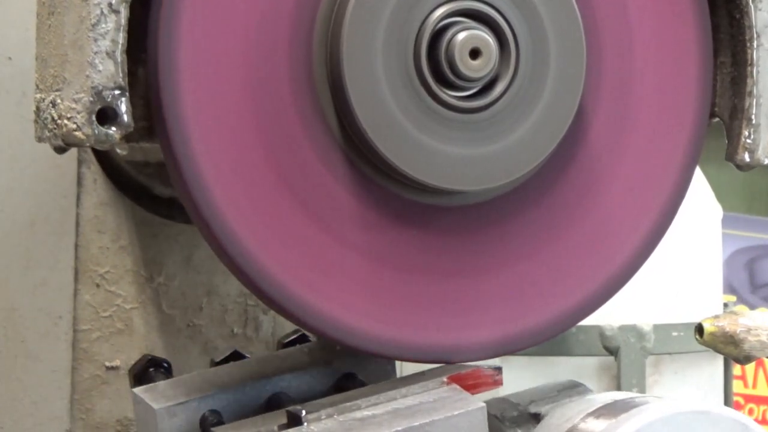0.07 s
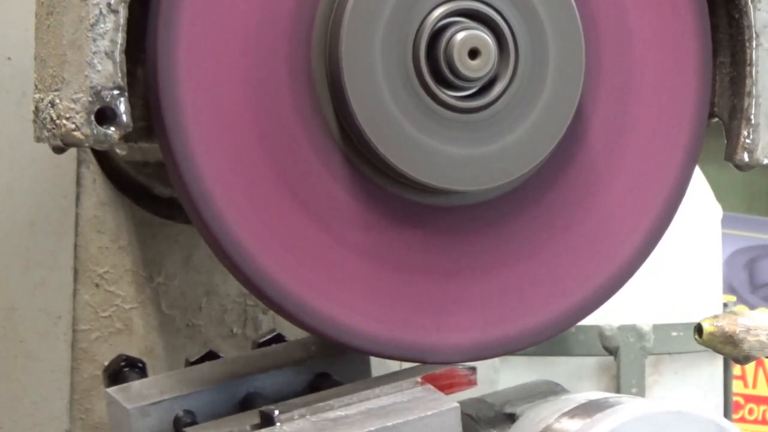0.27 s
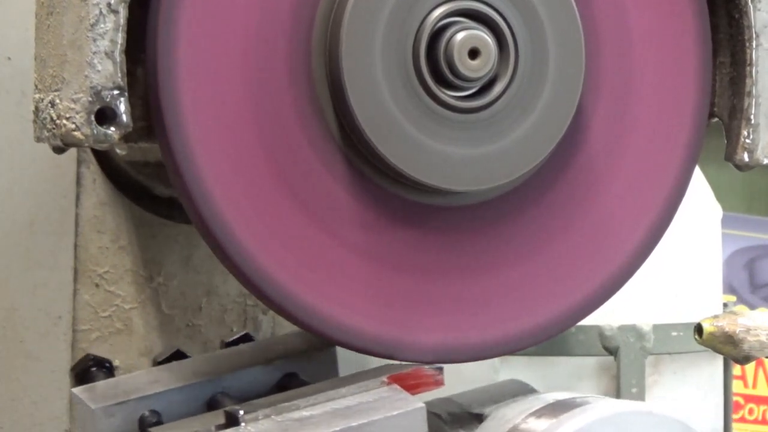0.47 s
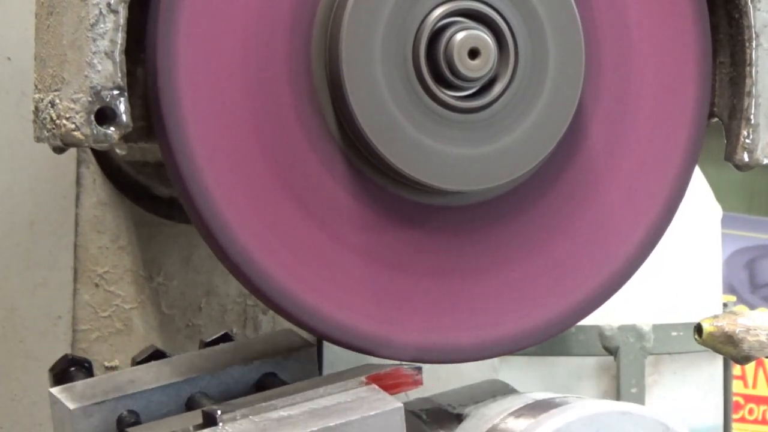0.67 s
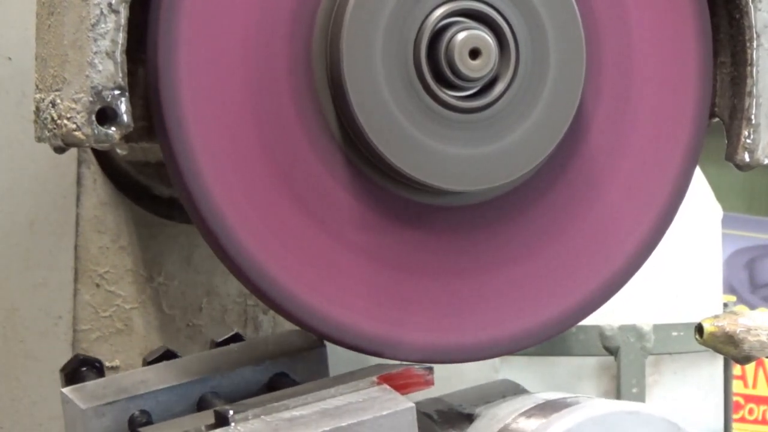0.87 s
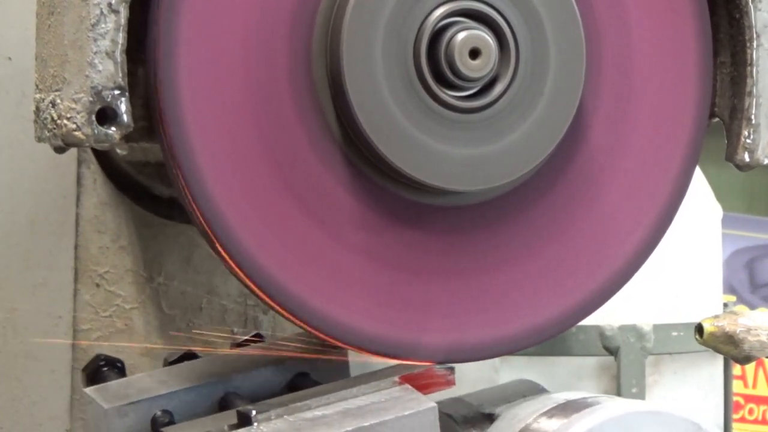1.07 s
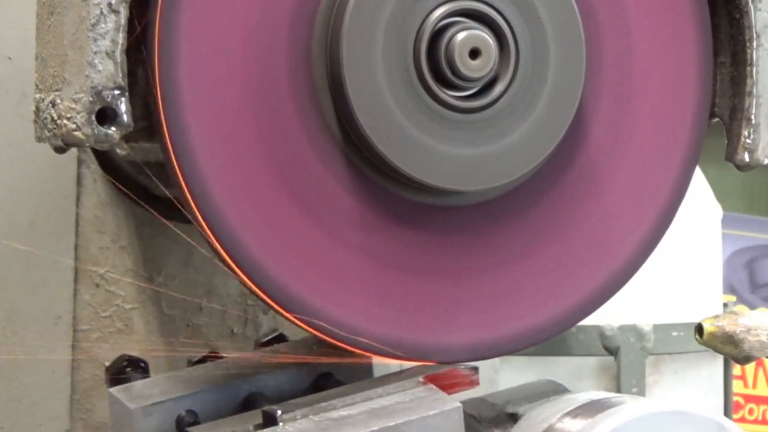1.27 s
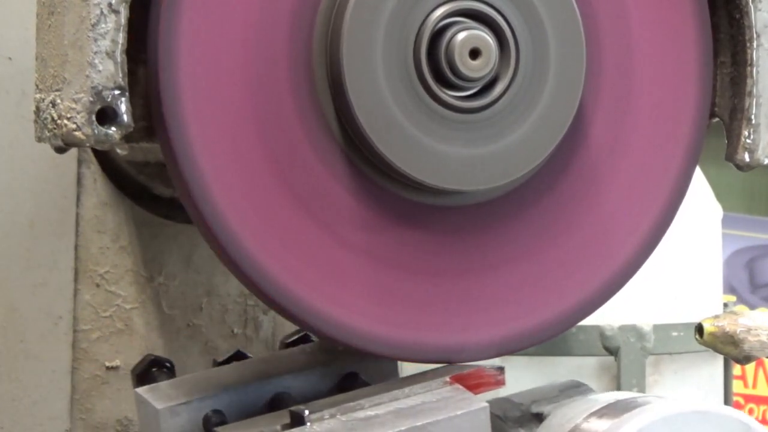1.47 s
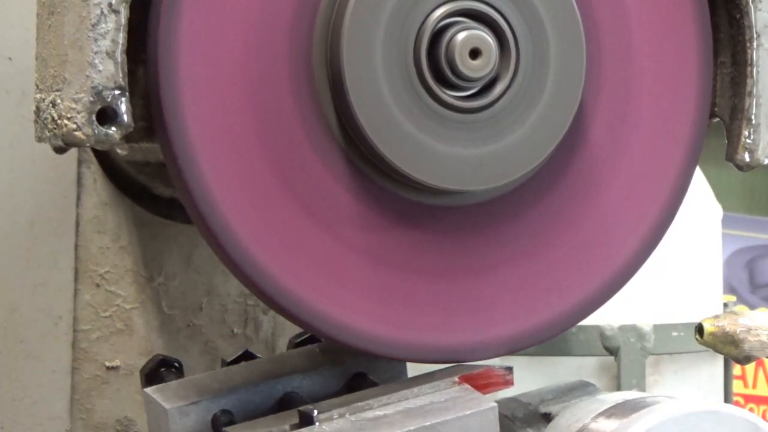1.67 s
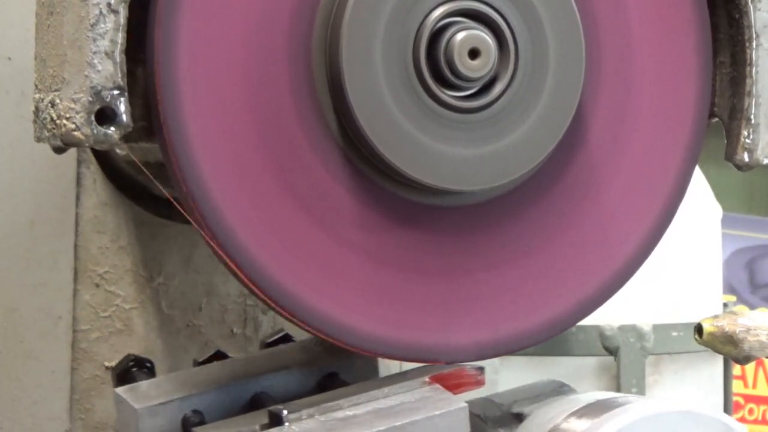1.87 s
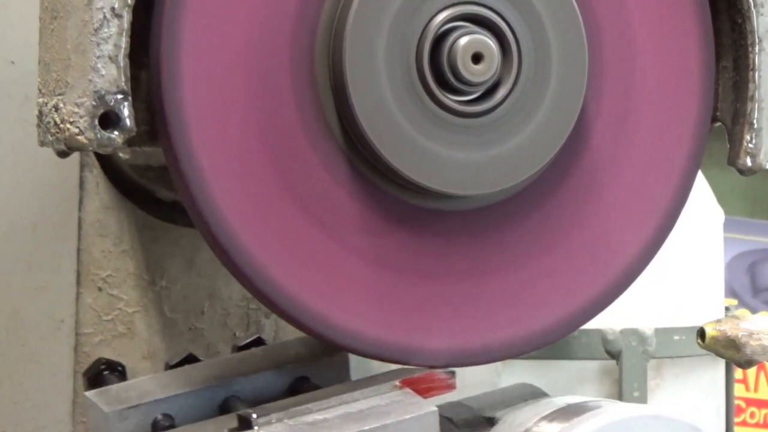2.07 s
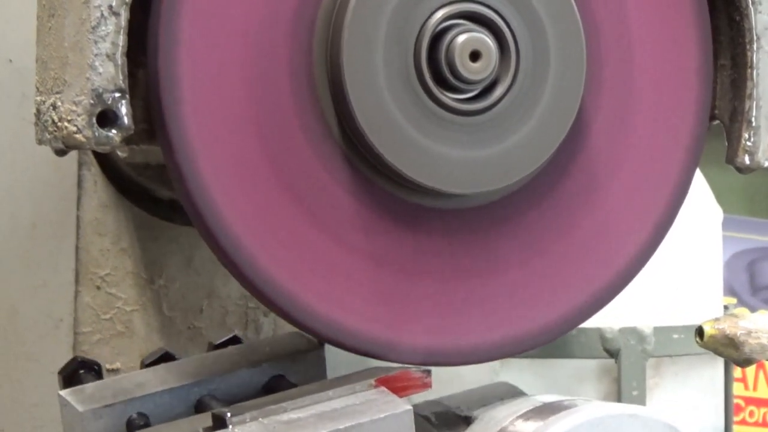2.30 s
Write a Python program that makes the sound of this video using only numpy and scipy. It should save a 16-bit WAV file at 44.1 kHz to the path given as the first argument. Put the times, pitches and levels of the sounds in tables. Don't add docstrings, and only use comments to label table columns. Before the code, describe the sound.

A surface grinder runs with a steady mid-pitched motor hum and airy roar; its wheel cuts steel in three abrupt, bright, buzzing rasps, the second longest. Close stereo microphone in a small workshop with short echo.

```python
import sys
import numpy as np
from scipy import signal
from scipy.fft import rfft, irfft, next_fast_len
from scipy.io import wavfile
from scipy.ndimage import uniform_filter1d, map_coordinates

SR = 44100
rng = np.random.default_rng(int(sys.argv[2]) if len(sys.argv) > 2 else 0)


def wrap_up_sound(samples):
    columns = np.atleast_2d(samples).T
    tamed = np.clip(columns, -1, 1)
    steps = np.round(tamed * 32767).astype(np.int16)
    wavfile.write(sys.argv[1], SR, steps)


def volts_from_decibels(level):
    exponent = np.asarray(level, float) / 20
    return 10 ** exponent


N = 103061
T = np.arange(N) / SR
LEFT_RIGHT = np.array([[1], [-1]])


def rms_one(x):
    return x / np.sqrt(np.mean(x ** 2) + 1e-20)


def colour(x, points):
    hz, db = np.transpose(points)
    size = next_fast_len(len(x) + 4096)
    bin_hz = np.arange(size // 2 + 1) * SR / size
    gain_db = np.interp(np.log(bin_hz + 1), np.log(hz), db)
    return irfft(rfft(x, size) * volts_from_decibels(gain_db), size)[:len(x)]


def resonate(x, hz, width_hz):
    r = np.exp(-np.pi * width_hz / SR)
    feed = np.sqrt((1 - r * r) / 2) * np.array([1, 0, -1])
    return signal.lfilter(feed, [1, -2 * r * np.cos(2 * np.pi * hz / SR), r * r], x)


def low_pass(x, hz):
    return signal.sosfilt(signal.butter(2, hz, fs=SR, output="sos"), x)


def drift(rate):
    count = int(T[-1] * rate * 2) + 2
    return np.interp(T * rate * 2, np.arange(count), rng.standard_normal(count))


def fan_and_bearing_roar():
    # pitch_hz, level_db
    roar_curve = [(25, -30), (150, -20.5), (300, -8.5), (1700, -8), (3000, -13.5), (10500, -19.5),
                  (13000, -33), (15600, -45)]
    # pitch_hz, level_db
    roar_width = [(60, -17), (250, -28.5), (500, -19), (950, -7), (2380, -7.5), (5980, -8.5),
                  (10000, -15.5), (14000, -45)]
    # pitch_hz, width_hz, level_db
    housing = [(272, 2.7, -15), (359.2, 13, -9.5), (390, 16, -14.5), (481, 4.6, -15.5), (950, 28, -16.5),
               (1052, 16, -13), (1126, 21, -18), (1520, 165, -9), (2075, 45, -17), (4100, 1600, -10)]
    roar_db, flicker_db = 3, 0.66
    white = rng.standard_normal((4, N))
    scale = volts_from_decibels(roar_db) / np.std(colour(white[0], roar_curve))
    pair = []
    for air, body in (white[:2], white[2:]):
        ringing = sum(volts_from_decibels(db) * resonate(body, hz, width) for hz, width, db in housing)
        pair.append(scale * colour(air, roar_curve) + ringing)
    mid, side = pair[0], colour(pair[1], roar_width)
    return np.array([mid + side, mid - side]) * volts_from_decibels(flicker_db * drift(15))


def motor_tones():
    # pitch_hz, level_db, wander_hz, left_right_db
    tones = [(59, -34, .5, 0), (89, -27, .5, 0), (119.5, -23, .5, 0), (178, -28, .5, 0), (228, -24, 1.5, 0),
             (410, -6, .8, -1.5), (831, -8.5, .8, 2)]
    out = np.zeros((2, N))
    for hz, db, wander_hz, pan_db in tones:
        phase = 2 * np.pi * np.cumsum(hz + wander_hz * drift(3.95)) / SR + rng.uniform(0, 6.3)
        lead = pan_db / 6 * LEFT_RIGHT
        loudness_db = db + 3 + 3.2 * drift(8) + pan_db / 2 * LEFT_RIGHT
        out += volts_from_decibels(loudness_db) * np.sin(phase + lead)
    return out


def motor():
    # start_s, level_db
    motor_level = [(0, -25.5), (.12, -25.5), (.32, -24.5), (.40, -30), (.47, -26), (.7, -25), (1.03, -23),
                   (1.08, -33), (1.3, -33.5), (1.46, -27.5), (1.5, -26.5), (1.84, -26), (1.98, -31),
                   (2.08, -34), (2.15, -26), (2.33, -27)]
    treble_follows = 0.9
    level_db = np.interp(T, *np.transpose(motor_level))
    sound = fan_and_bearing_roar() + motor_tones()
    low = low_pass(sound, 2500)
    treble = (sound - low) * volts_from_decibels((treble_follows - 1) * (level_db - level_db.max()))
    return volts_from_decibels(level_db) * (low + treble)


def shop(x):
    # pitch_hz, side_db relative to the middle
    shop_width = [(300, -14), (1500, 3), (4000, -4), (9000, -7), (13000, -46)]
    echo_db, fade_60db_s = -8, .17
    t = T[:SR // 2]
    tail = rng.standard_normal((2, SR // 2)) * volts_from_decibels(-60 * t / fade_60db_s) * (t > .002)
    mid, side = (signal.fftconvolve(x, h / np.sqrt(np.sum(h ** 2)))[:N] for h in tail)
    side = colour(side, shop_width)
    return volts_from_decibels(echo_db) * np.array([mid + side, mid - side])


def grit(size):
    spread_db = 1.5
    return rms_one(rng.standard_normal(size) * volts_from_decibels(spread_db * rng.standard_normal(size)))


def wheel_turns(since, fast, slow):
    sag_s = .04
    sagging = sag_s * (1 - np.exp(-np.abs(since) / sag_s))
    return slow * since + (fast - slow) * np.where(since > 0, sagging, since)


def oval_bite(angle, dip_db):
    rise, lift = 0.021, 0.32
    fall = 0.36 * (10.5 / np.maximum(dip_db, 3)) ** 2
    spots = []
    for late, share in ((0, 1), (.42, .2)):
        a = (angle - late) % 1
        spots.append(share * np.clip(a / rise, 0, 1) * np.exp(-a / fall))
    return np.clip((1 - angle) / lift, 0, 1) * np.max(spots, axis=0)


def grit_force(gate, angle, repeats):
    surface = map_coordinates(grit(760), [angle * 760], order=3, mode="grid-wrap")
    fresh = grit(N)
    swap = np.sqrt(repeats) * surface - (1 - np.sqrt(1 - repeats)) * fresh
    return gate * (fresh + low_pass(swap, 7750)) + 1e-18


def steel_rasp(force, since, dulling_db):
    # pitch_hz, level_db
    rasp_curve = [(700, -29), (1500, -2), (3000, -4), (5500, -2.5), (9000, -1), (11400, -2), (12800, -3),
                  (15600, -34)]
    rasp_db, dulling_s, dull_above_hz = 1.5, 0.24, 6300
    rasp = volts_from_decibels(rasp_db) * colour(force, rasp_curve)
    top = colour(rasp, [(dull_above_hz * 0.86, -40), (dull_above_hz, 0)])
    loaded = np.tanh(np.clip(since / dulling_s, 0, 9) ** 2)
    return rasp + top * (volts_from_decibels(dulling_db * loaded) - 1)


def wheel_ring(force, k):
    # pitch_hz, width_hz, pass_1_db, pass_2_db, pass_3_db
    wheel_modes = [(1650, 120, -23, -18.5, -11), (3732, 35, -10.5, -19, -13.5), (4130, 28, -27, -29, -23),
                   (4770, 60, -27, -34, -33), (5220, 140, -28, -20, -32), (5853, 88, -7.5, -13.5, -13.5),
                   (6425, 120, -13, -13, -9), (7620, 120, -18, -20, -14.5), (8330, 180, -8, -20, -10),
                   (9140, 36, -3, -22, -8.5), (9060, 360, -19, -11.5, -9.5), (11610, 36, -11, -11.5, -10),
                   (12370, 22, -12, -11, -7), (15090, 43, -27, -21.5, -19)]
    return sum(volts_from_decibels(row[2 + k]) * resonate(force, row[0], row[1]) for row in wheel_modes)


def pattern_tones(turns, since, strength, k):
    order_numbers = [
        [101, 157],
        [30, 36, 54, 65, 100, 110, 148, 158],
        [64, 65, 71, 83, 101],
    ]
    order_levels = [
        [-15, -12],
        [-18, -18, -15, -5, -14, -8, -12, -4],
        [-10, -12, -14, -15, -13],
    ]
    build_s = [.004, .09, .03][k]
    tones = np.zeros(N)
    for order, db in zip(order_numbers[k], order_levels[k]):
        phase = 2 * np.pi * order * turns + 1.16 * drift(5)
        tones += volts_from_decibels(db + 3 + 1.7 * drift(11)) * np.sin(phase)
    return strength * np.tanh(np.clip(since / build_s, 0, 9)) * tones


def wheel():
    # start_s (first bite), touch_turns_per_s, loaded_turns_per_s, repeat_share (0-1)
    passes = [
        (.327, 58.4, 58.3, .4),
        (1.029, 58.45, 57.94, .85),
        (1.8525, 58.3, 58.16, .7),
    ]
    # start_s, level_db, dip_db (between bites)
    cuts = [
        [(.29, -34.5, 12), (.324, -21, 8), (.328, -15, 13), (.40, -18.5, 9), (.455, -21.5, 7), (.47, -30, 4),
         (.49, -48, 18.5)],
        [(1.015, -39, 7), (1.04, -21.5, 5.5), (1.08, -20.5, 5.5), (1.15, -19.5, 4.5), (1.3, -21.5, 2.5),
         (1.39, -18, 8), (1.45, -18.5, 7), (1.465, -38, 7), (1.48, -50, 11)],
        [(1.84, -40, -1), (1.855, -19, 10), (1.88, -20.5, 8.5), (1.97, -21.5, 5.5), (2.05, -19.5, 6.5),
         (2.12, -21, 7), (2.145, -26.5, 8), (2.165, -48, 10)],
    ]
    # pitch_hz, level_db
    cut_colour = [(12450, 0), (12800, -8), (14300, -12), (15050, 0)]
    dulling_db, bite_spread_db = [3, -5.5, 0], .6
    out = np.zeros(N)
    for k, ((start, fast, slow, repeats), cut) in enumerate(zip(passes, cuts)):
        cut_s, cut_db, cut_dip_db = np.transpose(cut)
        since = T - start
        turns = wheel_turns(since, fast, slow)
        angle = turns % 1
        dip_db = np.interp(T, cut_s, cut_dip_db)
        bite = oval_bite(angle, dip_db)
        strength_db = bite_spread_db * rng.standard_normal(256)[np.floor(turns).astype(int) % 256]
        depth = volts_from_decibels(np.interp(T, cut_s, cut_db, left=-120, right=-120))
        gate = depth * volts_from_decibels(dip_db * (bite - 0.865) * 2.14 + strength_db)
        force = grit_force(gate, angle, repeats)
        out += steel_rasp(force, since, dulling_db[k]) + wheel_ring(force, k)
        smooth = np.sqrt(depth * np.abs(uniform_filter1d(gate, size=200)))
        out += pattern_tones(turns, since, smooth, k)
    return colour(out, cut_colour)


def scene():
    cut = wheel()
    return motor() + cut + shop(cut)


def top_cut(x):
    return signal.sosfilt(signal.butter(12, 15710, fs=SR, output="sos"), x)


def record(dry):
    cutoff_hz = 15230
    mix = signal.sosfilt(signal.ellip(10, .5, 30, cutoff_hz, fs=SR, output="sos"), dry)
    return top_cut(mix)


dry = scene()
out = record(dry)
wrap_up_sound(out)
```